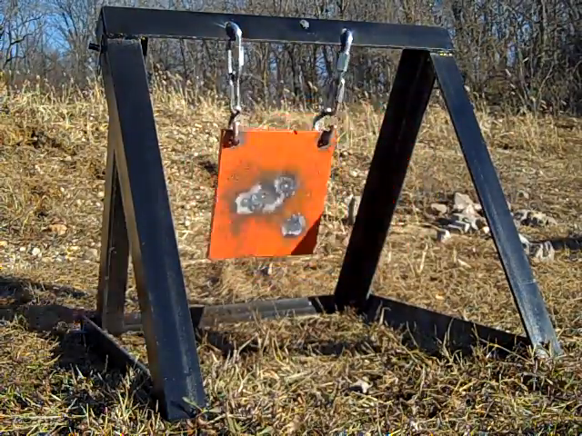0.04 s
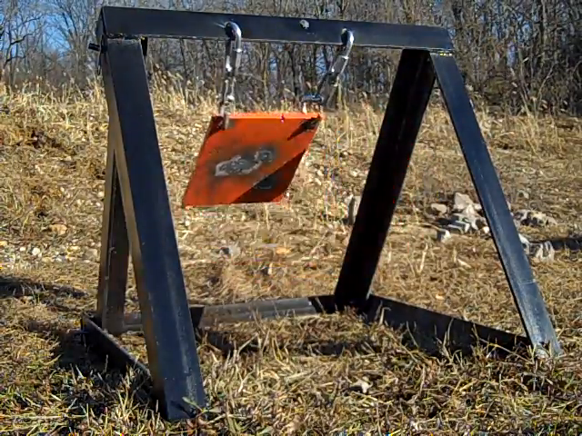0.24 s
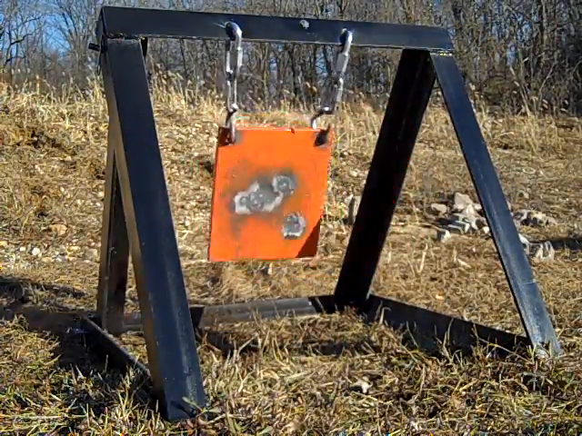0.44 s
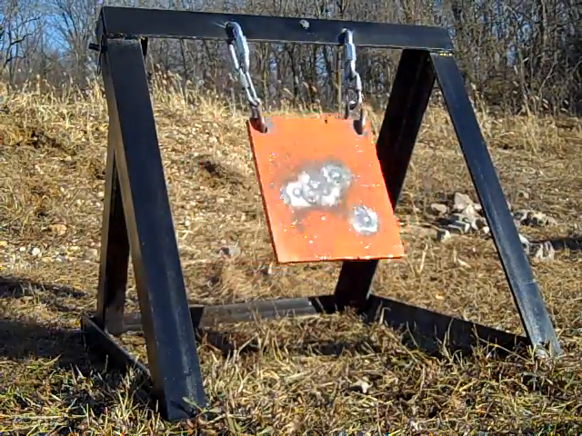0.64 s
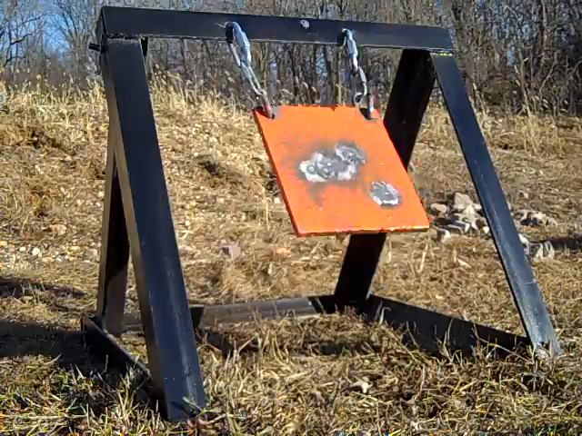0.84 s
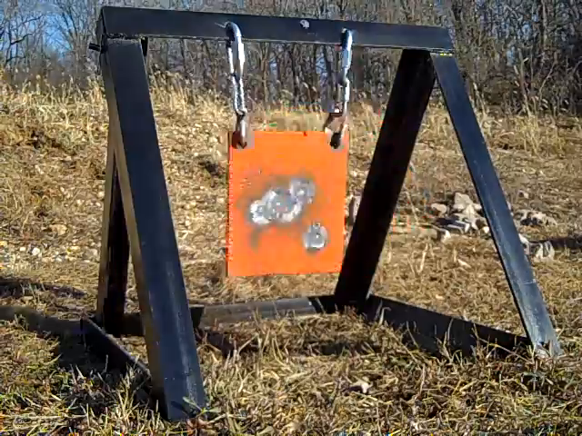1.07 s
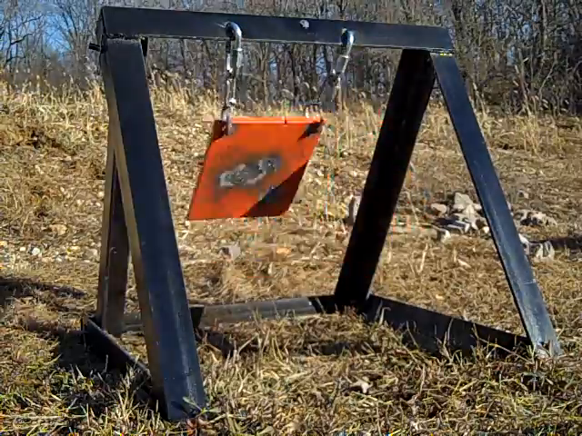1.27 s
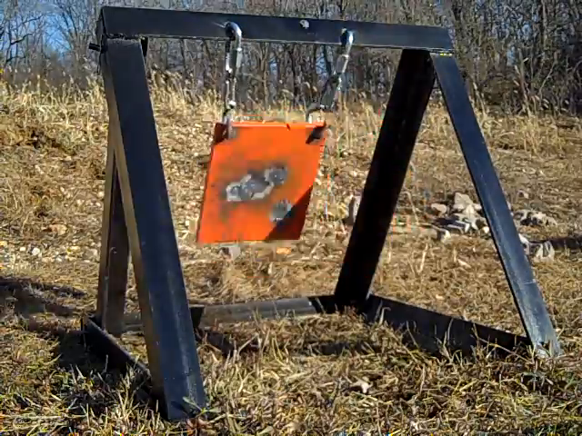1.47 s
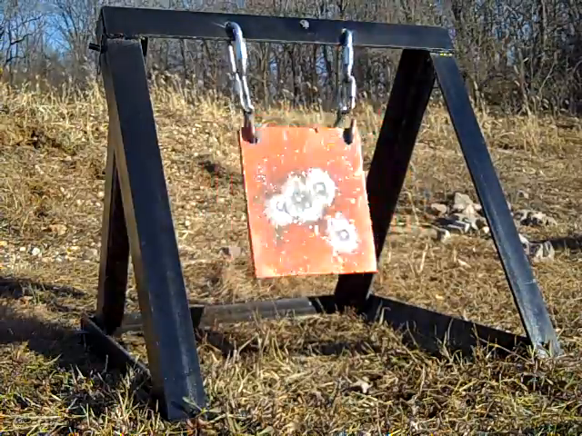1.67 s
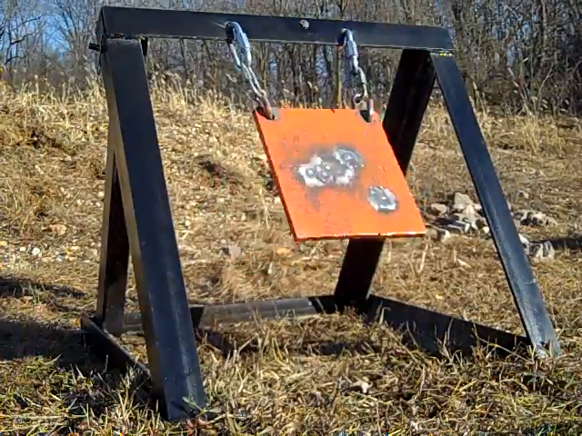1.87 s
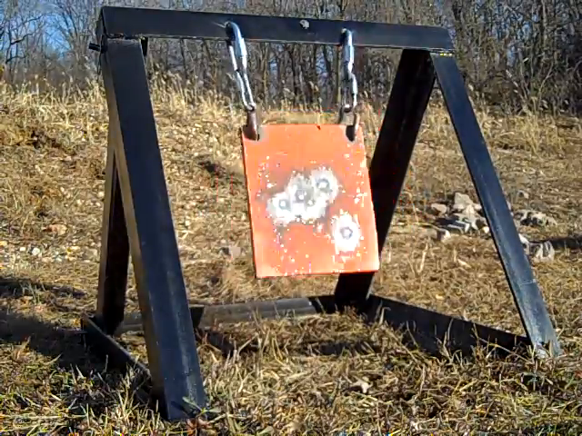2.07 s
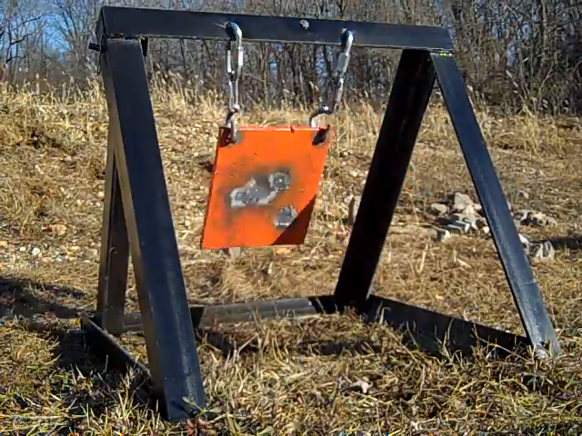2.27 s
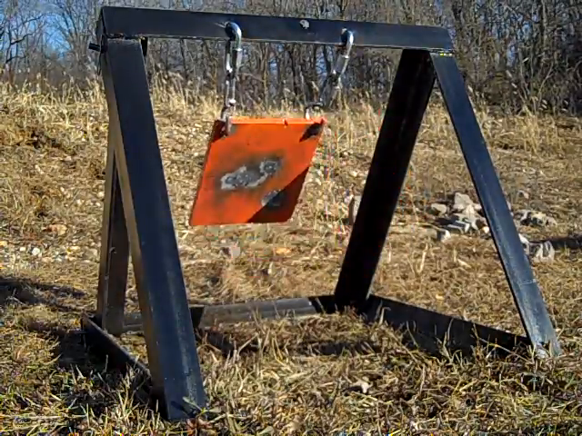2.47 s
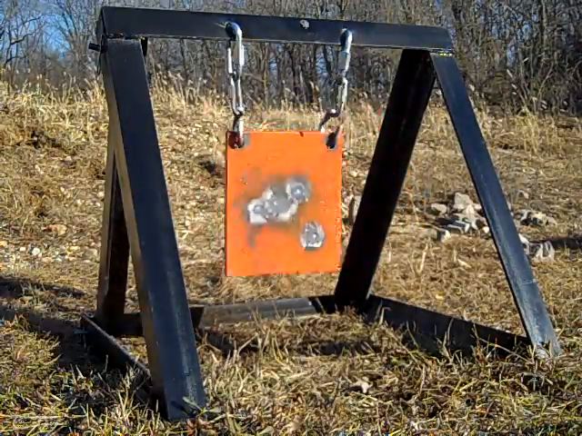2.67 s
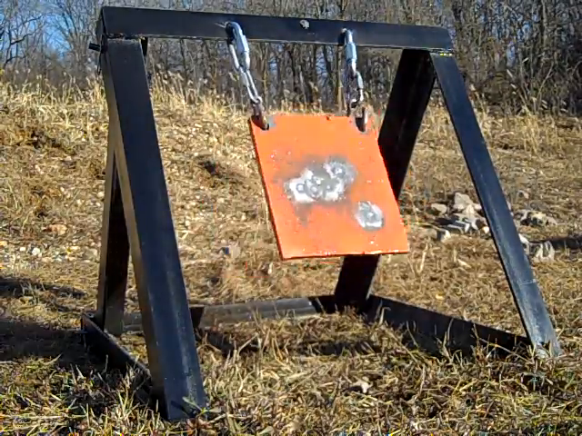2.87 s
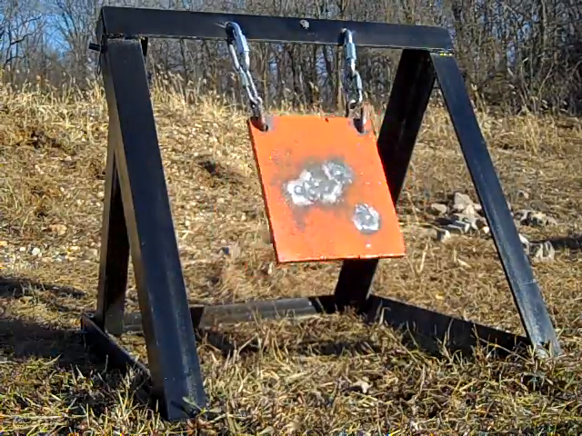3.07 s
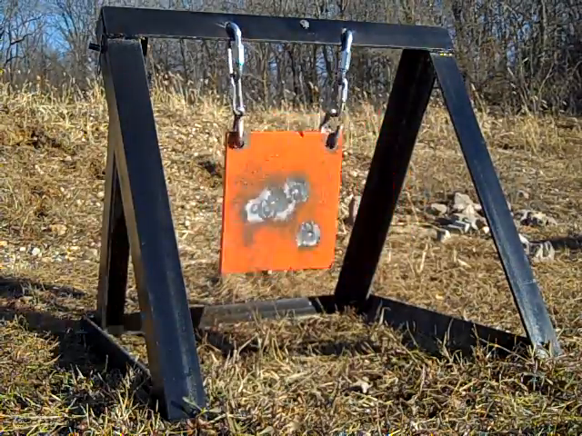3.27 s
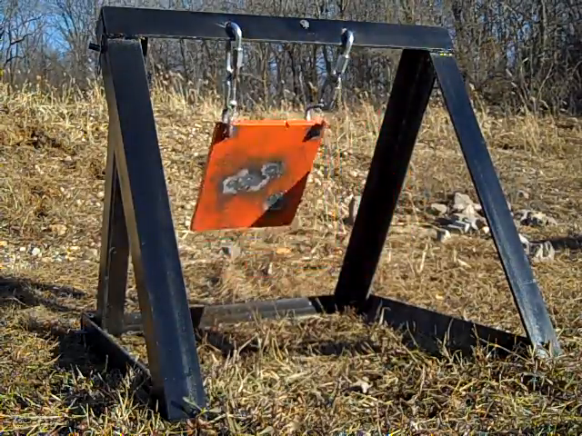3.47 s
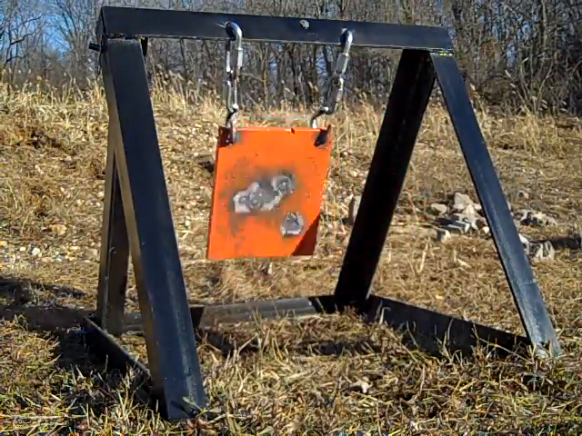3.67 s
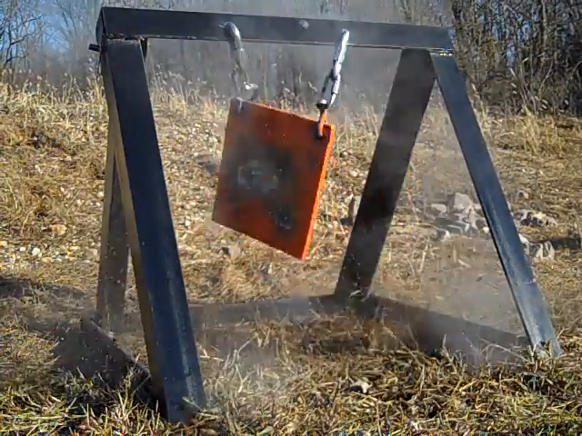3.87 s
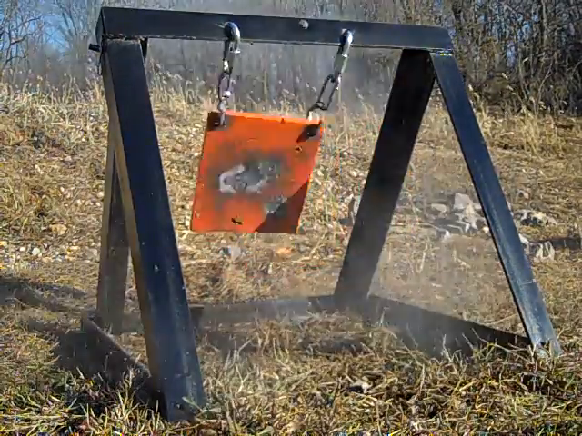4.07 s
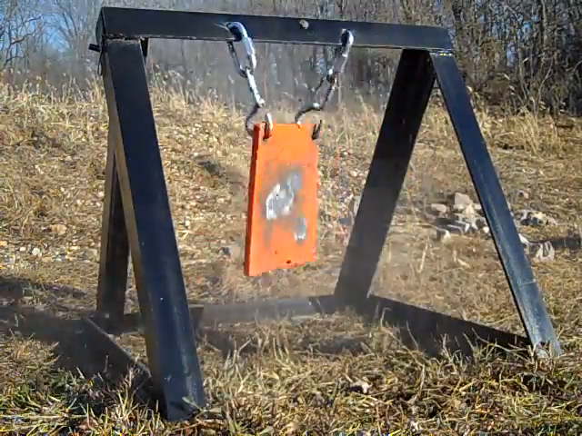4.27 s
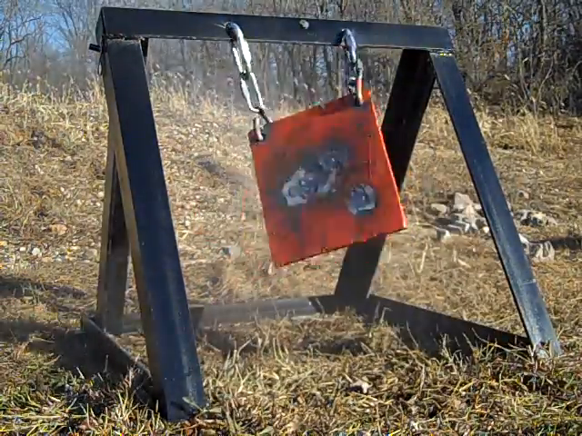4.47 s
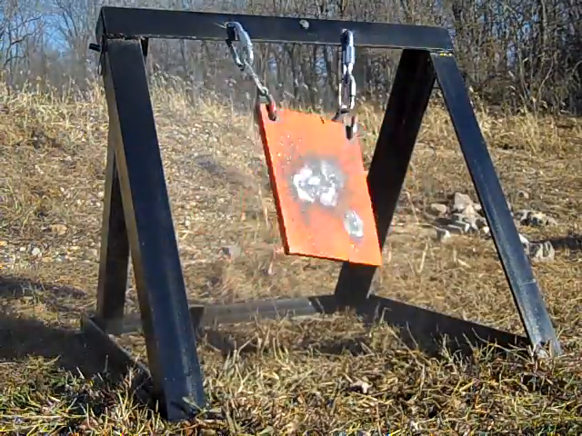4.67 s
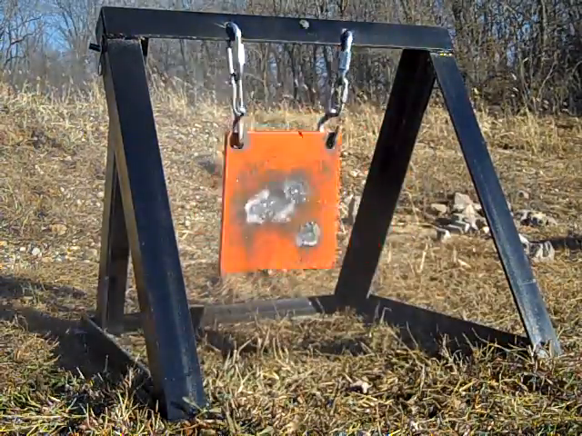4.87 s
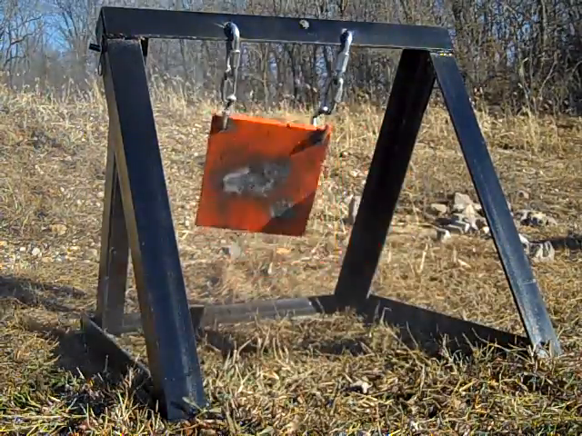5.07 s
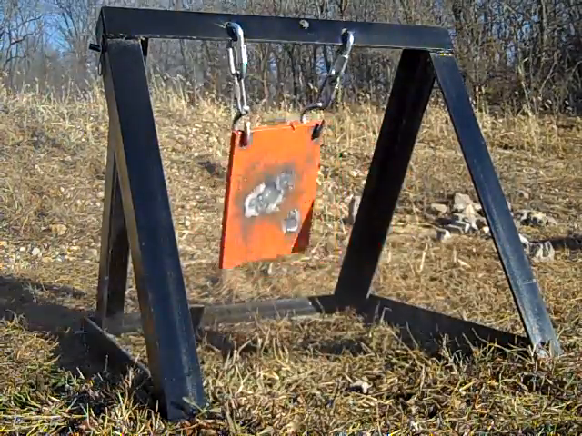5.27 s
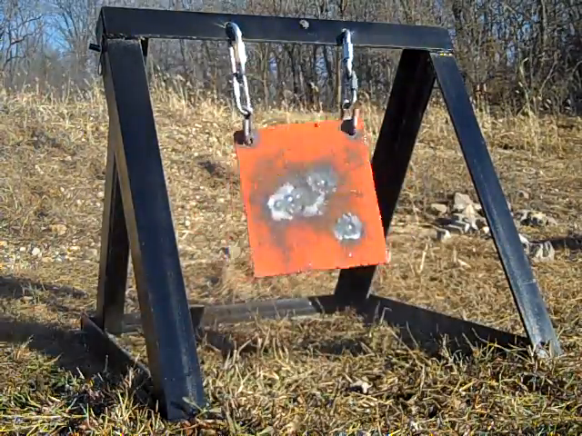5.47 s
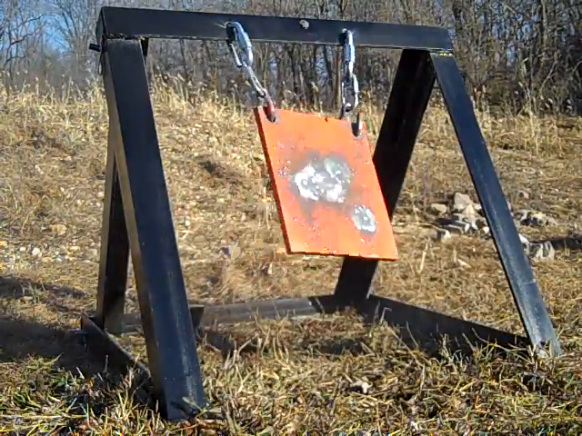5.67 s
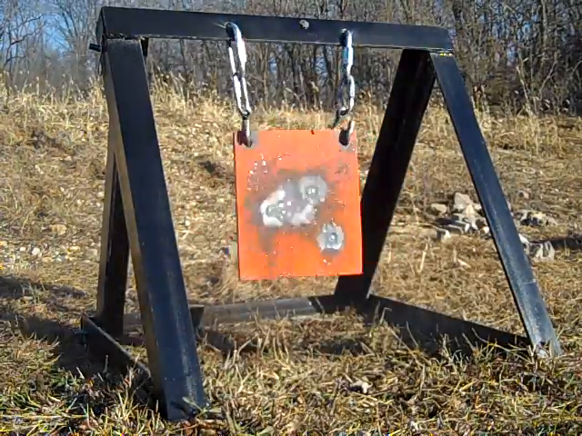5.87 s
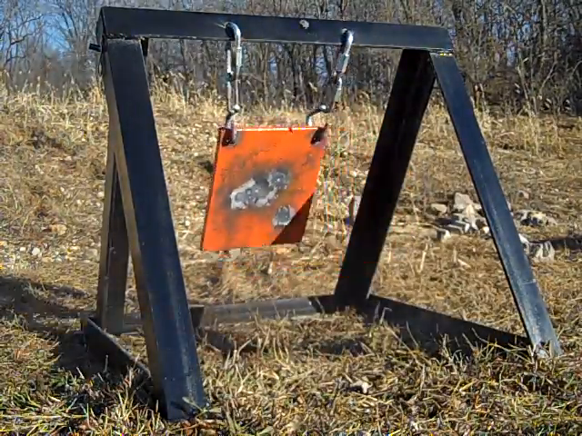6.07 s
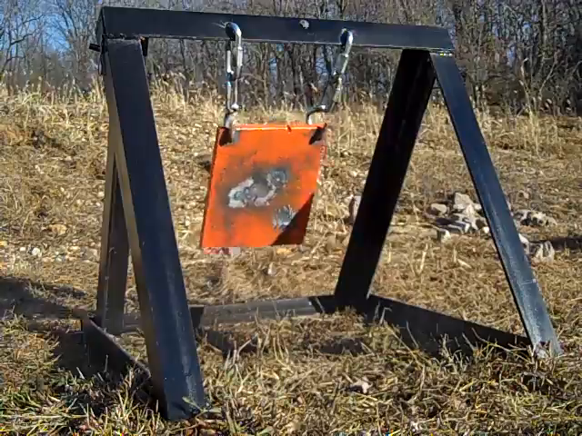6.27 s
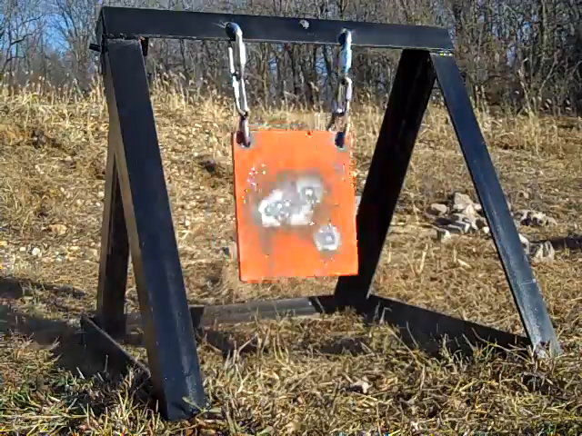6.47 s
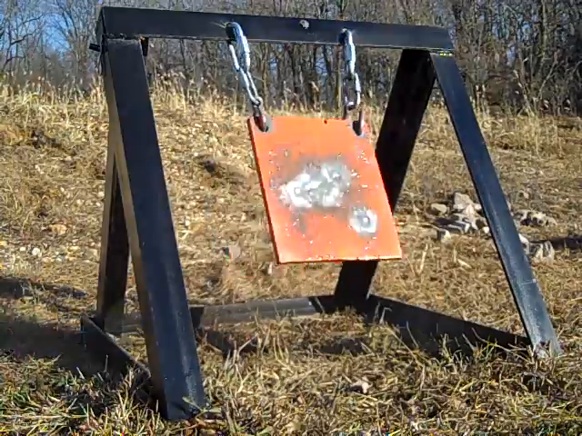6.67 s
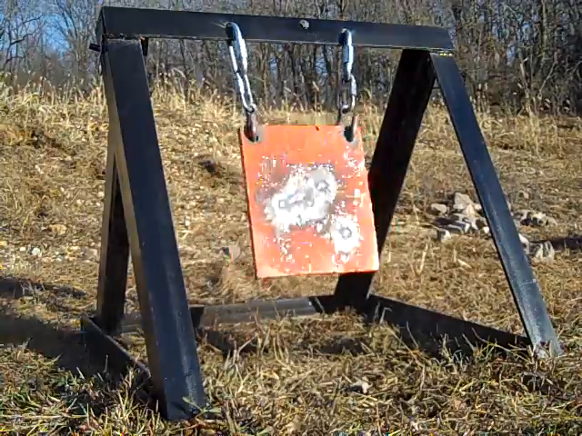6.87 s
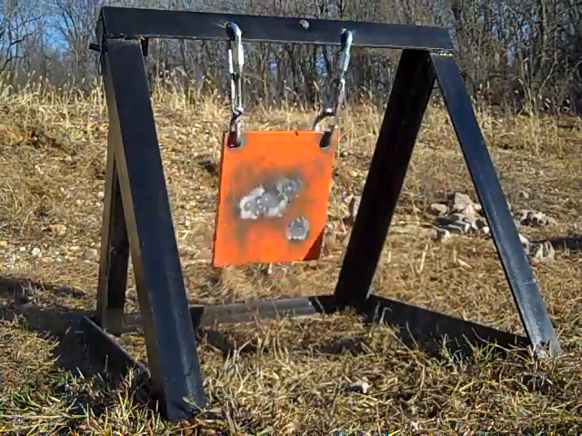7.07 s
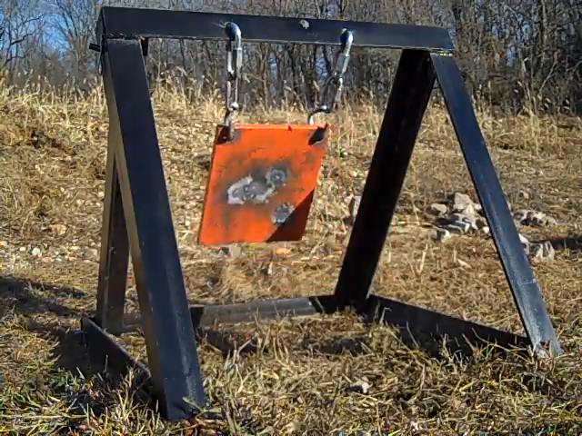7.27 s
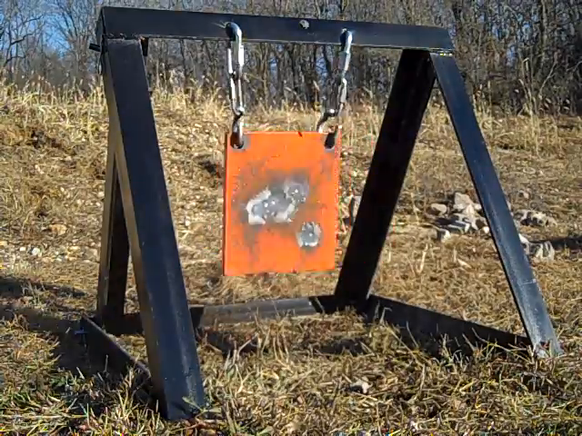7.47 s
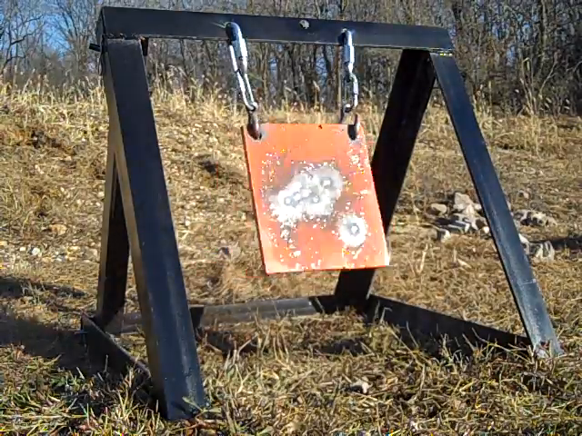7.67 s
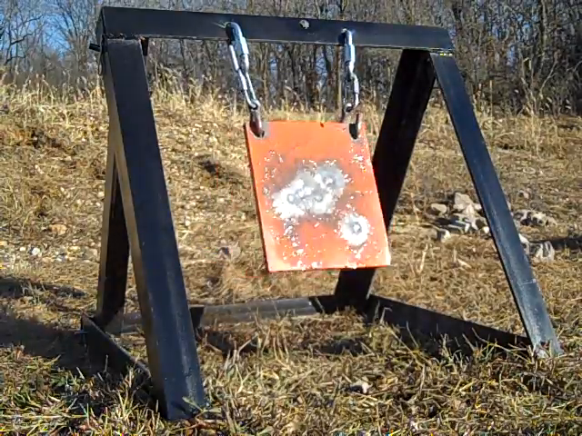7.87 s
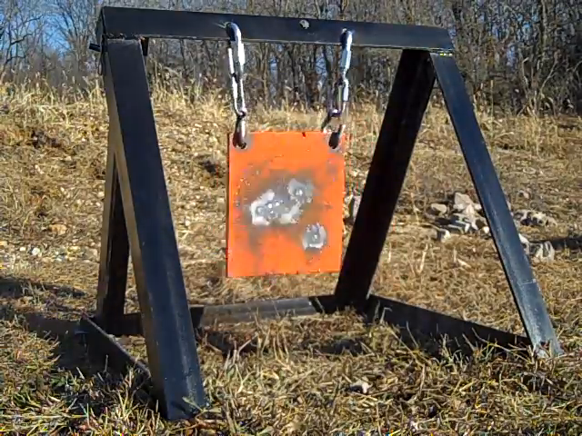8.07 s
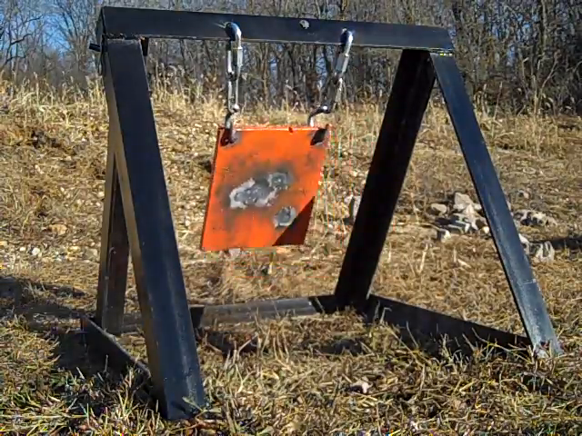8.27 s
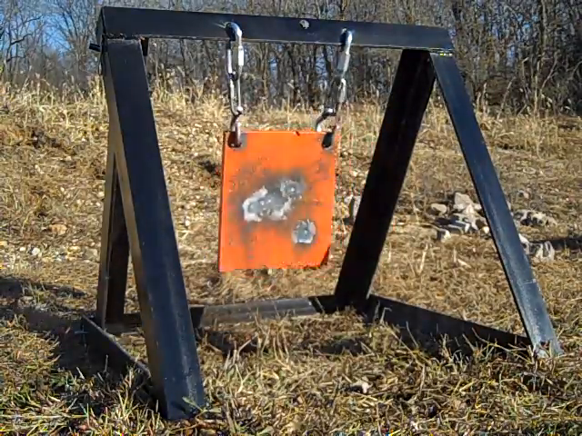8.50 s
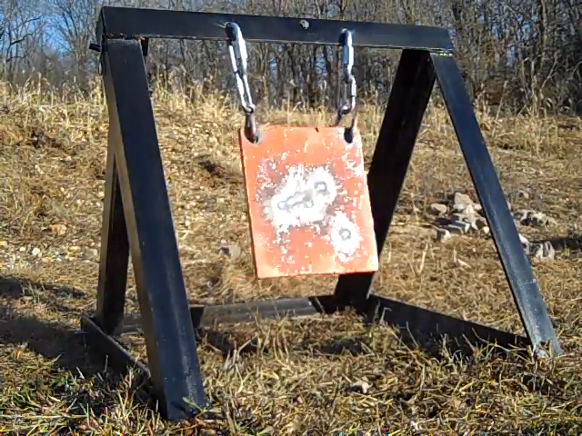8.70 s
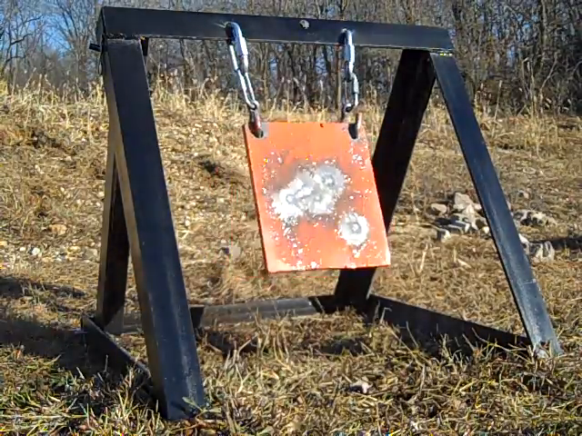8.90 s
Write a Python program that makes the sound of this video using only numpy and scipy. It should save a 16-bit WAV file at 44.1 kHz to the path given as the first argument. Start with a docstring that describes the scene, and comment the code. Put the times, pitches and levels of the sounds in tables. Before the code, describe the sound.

A quiet outdoor field with low airy rumble and faint dry-grass hiss, heard close by in stereo on a small camera microphone. A steel plate swings on chains: bright double clanks at 0.05, 1.1, 2.2 and 3.3 seconds, with fainter slips and ticks between. Light wind buffeting gathers around 3.4-3.7. At 3.85 a bullet hits with an explosive, clipping crack; gritty fragments spray for a fraction of a second and trickle away while high steel tones flare, sweep and shimmer. The dull muzzle thump comes at 4.0, and its rough echo swells from wooded hills to about 4.7, then fades. Chains jerk wildly from 4.4, hardest at 4.93, with a loose rattle at 5.1-5.7, strong clanks at 5.4 and 5.95, and a soft wind puff near 5.9. Weaker clanks follow at 6.5, 7.1 and 8.1, ending in barely audible ticks.

```python
"""A bullet cracks on a hung steel plate; fragments spray, the plate rings as it turns, and the muzzle report
comes late and rolls back from wooded hills. Chains jerk on a steel stand before and after; wind, dry grass.
Steel is decaying or beamed sine modes plus shaped noise; fragments, echo, wind and grass are coloured noise
under envelopes; the report is one filtered pressure pulse. The sum overloads a clipping, band-limited camera."""
import sys
import numpy as np
from scipy import signal
from scipy.fft import rfft, irfft, next_fast_len
from scipy.io import wavfile
from scipy.ndimage import map_coordinates

SR = 44100
rng = np.random.default_rng(int(sys.argv[2]) if len(sys.argv) > 2 else 0)


def master_out(mix):
    """Clip the mix to full scale and print it as 16-bit PCM to the path in sys.argv[1]."""
    frames = np.transpose(np.atleast_2d(mix))
    ceiling = np.clip(frames, -1, 1)
    pcm = np.round(ceiling * 32767).astype(np.int16)
    wavfile.write(sys.argv[1], SR, pcm)


N = 394254
HIT_S, REPORT_S = 3.8505, 4.0168
MEDIUM_JERK_DB = -19.5  # reference on the jerk level scale

# crowded higher modes of the steel: f/Hz, relative density/dB per Hz
CLATTER_SPECTRUM = [(150, -28.5), (600, -16.5), (1000, -4), (1550, -9), (2130, 7.5), (2400, -1.5),
                    (3600, -2), (5500, 1.5), (7500, -6.5), (8300, -6.5), (9000, -18), (11000, -33),
                    (14000, -39)]
# sounds from the front: f/Hz, left-right correlation
FRONT_LIKENESS = [(100, 1), (1500, 0.83), (3000, .88), (6200, .6), (13000, .15)]


def amp(db):
    """Amplitude ratio of a level in dB."""
    return 10 ** (np.asarray(db) / 20)


def unit(x):
    """x scaled to rms 1."""
    return x / np.sqrt(np.mean(x ** 2) + 1e-20)


def along(points, hz):
    """Interpolate (f/Hz, value) points on a log-frequency axis."""
    f, value = np.transpose(points)
    return np.interp(np.log(hz + 1), np.log(f + 1), value)


def clock(n=N):
    """Sample times in s."""
    return np.arange(n) / SR


def wobble(rate_hz, n=N):
    """Smooth random curve through rate_hz random knots a second."""
    knots = rng.standard_normal(int(n * rate_hz / SR) + 4)
    return map_coordinates(knots, [clock(n) * rate_hz])


def filtered(x, response):
    """x with its spectrum multiplied by response(hz)."""
    n = x.shape[-1]
    m = next_fast_len(n + 4096)
    hz = np.fft.rfftfreq(m, 1 / SR)
    return irfft(rfft(x, m) * response(hz), m)[..., :n]


def noise(spectrum, likeness, n=N):
    """Stereo noise of rms 1; the mid/side balance sets the left-right correlation per frequency."""
    def mid_side_gain(hz):
        turn = np.arccos(np.clip(along(likeness, hz), -1, 1)) / 2
        return amp(along(spectrum, hz)) * [np.cos(turn), np.sin(turn)]

    mid, side = filtered(rng.standard_normal((2, n)), mid_side_gain)
    return unit(np.array([mid + side, mid - side]))


def add(out, start_s, x):
    """Mix x into out from start_s, cut at the end."""
    part = out[:, round(start_s * SR):][:, :x.shape[1]]
    part += x[:, :part.shape[1]]


def plate():
    """The turning plate sweeps each mode's lobed beam past the microphone until edge-on; the ground scatters."""
    # plate modes: f/Hz, relative level/dB, beam direction/deg, half-width/deg, lobe spacing/deg
    plate_modes = [(2170, -19, 46, 8, 150), (4352, -5, 54, 12, 150), (5017, -23.5, 42, 11, 150),
                   (6470, 0, 13.5, 7, 22), (6580, -10.5, 37, 45, 25), (7191, -19.5, 37, 17, 23),
                   (8130, -28.5, 37, 20, 150), (9165, -20.5, 28, 45, 21), (10400, -34.5, 60, 40, 26)]
    turn_deg, turn_s = 142.5, .27  # final angle, time constant
    scatter_db, scatter_t60_s = -32, 1.9
    flutter_db = 1.5
    out, t = np.zeros((2, N)), clock(SR)
    angle = turn_deg * (1 - np.exp(-t / turn_s))
    facing = np.sqrt(np.maximum(np.cos(np.radians(angle)), 0))
    port_lag_rad = np.array([[0], [.7]])
    for hz, db, direction, width, spacing in plate_modes:
        off_axis = angle - direction
        lobes = np.hypot(np.cos(np.pi * off_axis / spacing), .2)
        flutter = amp(flutter_db * wobble(110, SR))
        beam = facing * lobes / (1 + (off_axis / width) ** 2) * flutter
        scatter = amp(scatter_db - 60 * t / scatter_t60_s) * np.array([wobble(40, SR), wobble(40, SR)])
        tone = np.sin(2 * np.pi * hz * t + port_lag_rad)
        add(out, HIT_S, amp(db) * (beam + scatter) * tone)
    return out


def spray():
    """The bullet bursts; fragments pepper stand and ground, then grit trickles down: lumpy decaying noise."""
    # fragment noise: f/Hz, relative density/dB per Hz
    grit_spectrum = [(30, 8.5), (300, 1), (700, -3), (2000, -2), (3300, -3), (5000, -3), (7300, -0.5),
                     (9500, -7.5), (13500, -9), (16000, -31.5)]
    # duller landings: f/Hz, gain/dB
    landing_tilt = [(1000, 0), (6000, 0), (12000, -2)]
    burst_db, burst_fall_db_per_s = 0, 400
    shower_db, shower_hold_s, shower_fall_db_per_s = -17, .125, 328  # level before the tilt
    dust_db, dust_fall_db_per_s = -34.5, 56.5  # level before the tilt

    def grit():
        lumps = amp(2.2 * wobble(900) + 1.2 * wobble(70))
        return unit(lumps * noise(grit_spectrum, [(200, .6), (1500, .09), (8000, .2)]))

    t = np.maximum(clock() - HIT_S, 0)
    burst = amp(burst_db - burst_fall_db_per_s * t)
    shower = amp(shower_db - shower_fall_db_per_s * np.maximum(t - shower_hold_s, 0))
    dust = amp(dust_db - dust_fall_db_per_s * t)
    landing = filtered(grit(), lambda hz: amp(along(landing_tilt, hz)))
    return (t > 0) * (burst * grit() + np.hypot(shower, dust) * landing)


def report():
    """The far muzzle blast: one pressure pulse, rounded by its path over the ground."""
    out = np.zeros((2, N))
    u = clock(SR // 10) / .0022  # time in 2.2 ms pulse lengths
    blast = (1 - u) * np.exp(-u)
    path = signal.butter(2, [130, 370], "bandpass", fs=SR, output="sos")
    pulse = signal.sosfilt(path, blast)
    peak_db = [[-3], [-5]]  # left, right
    add(out, REPORT_S, amp(peak_db) * pulse / abs(pulse).max())
    return out


def roll(peak_db, rise_db_per_s, fade_s, loss_db):
    """Echo gain: builds from the report to its peak, then loses loss_db per doubling of 1 + t / fade_s."""
    t = clock() - 4.677  # the main hillside's echo arrives
    rise_db = rise_db_per_s * np.minimum(t, 0)
    fade_db = loss_db * np.log2(1 + np.maximum(t, 0) / fade_s)
    return (clock() > REPORT_S) * amp(peak_db + rise_db - fade_db)


def woods():
    """Countless trunks return the shot as a roll: lumpy noise in a dull and a bright part."""
    # dull part: f/Hz, relative density/dB per Hz
    boom_spectrum = [(21, -53), (35, -30), (81, -12.5), (134, -10), (172, -4), (230, -2), (354, -9.5),
                     (555, -12), (779, -14.5), (841, -14.5), (1400, -27.5), (1820, -64), (3080, -120)]
    # bright part: f/Hz, relative density/dB per Hz
    rush_spectrum = [(600, -32.5), (1200, -1.5), (2200, -1), (3300, -12), (5000, -14), (7500, -12.5),
                     (9500, -27.5), (14000, -41.5)]
    lumps = amp(1.6 * wobble(32))
    boom = unit(lumps * noise(boom_spectrum, FRONT_LIKENESS))
    rush = unit(lumps * noise(rush_spectrum, FRONT_LIKENESS))
    boom_gain = roll(peak_db=-18, rise_db_per_s=44, fade_s=.2881, loss_db=13)
    rush_gain = roll(peak_db=-33, rise_db_per_s=18.5, fade_s=.79, loss_db=23)
    return boom_gain * boom + rush_gain * rush


def chains():
    """Chains jerk the stand; each jerk gets a faint settling tick, and slack links rattle at random."""
    # chains snap taut in pairs once a swing, slip at the far end, jerk wildly after the hit:
    # t/s, level before overall gain/dB, level of the whole clank below about 4 kHz (dull against bright)/dB
    jerks = [(0.0275, -11, -14.5), (0.0617, -8.5, -12), (0.5028, -30, -6), (0.5405, -33, -10),
             (0.6429, -26.5, -12.5), (1.0083, -35, -14), (1.1235, -9, -14.5), (1.1597, -9.5, -12),
             (1.596, -29, -9), (1.7347, -30, -10.5), (2.2084, -13, -15), (2.2527, -9.5, -15.5),
             (2.6726, -30, -8), (2.827, -33, -7.5), (3.2907, -15.5, -14.5), (3.338, -10.5, -16),
             (3.7771, -33, -6), (4.4127, -16, -17), (4.465, -23, -19), (4.5406, -14, -13),
             (4.7009, -15.5, -15.5), (4.7454, -14.5, -12), (4.9075, -11, -18), (4.9318, 1.5, -19.5),
             (4.9453, -2.5, -20), (5.2063, -26, -6), (5.2257, -27, -3), (5.271, -25, -7), (5.3689, -32, 0),
             (5.4018, -7.5, -13), (5.4584, -29, -6), (5.5832, -35, -4), (5.6988, -18.5, -10.5),
             (5.9071, -28.5, -6.5), (5.9448, -10, -17), (6.042, -27, -7), (6.0945, -28.5, -21),
             (6.357, -36, -5), (6.4927, -18.5, -10.5), (7.0393, -24, -10), (7.0848, -12.5, -13),
             (7.4579, -41, -4.5), (7.5978, -33, -9.5), (8.105, -15, -12), (8.159, -17.5, -12.5),
             (8.5852, -41, -10), (8.6539, -33, -15), (8.7151, -39, -6)]
    settle_s, settle_db, settle_db_per_db = .048, -38.5, .32  # nominal gap; tick of a medium jerk; growth
    rattle_start_s, rattle_end_s, rattle_db = 5.12, 5.66, -39  # mean level before overall gain
    out = np.zeros((2, N))
    for s, db, dullness_db in jerks:
        add(out, s, clank(db, dullness_db))
        tick_db = settle_db + settle_db_per_db * (db - MEDIUM_JERK_DB)
        add(out, s + settle_s * rng.uniform(.7, 1.4), clank(tick_db, dullness_db=-8.5))
    for s in rng.uniform(rattle_start_s, rattle_end_s, size=9):
        add(out, s, clank(rattle_db + rng.normal(0, 2.5), dullness_db=-5))
    return out


def clank(db, dullness_db):
    """One jerk cracks, rings stand and links, and its crack rebounds 4-7 ms later."""
    # steel stand modes: f/Hz, relative level/dB, t60/s
    stand_modes = [(950, -15, .2), (1865, -11, .22), (1976, -11.5, 0.17), (2145, 4, .11), (2602, -4.5, .2),
                   (2860, -0.5, .15), (3020, -8, .2), (3550, -7, .17), (3652, -6, .2), (4496, -3, .12),
                   (4872, -4, .14), (5420, -2.5, .14), (5577, -3.5, .16), (5696, -4.5, .15), (6045, -6, .1),
                   (6336, 1.5, 0.14), (7004, -8, .19), (7200, -11, .2), (7332, -7.5, .19),
                   (8270, -3.5, .12)]
    # chain link modes: f/Hz, relative level/dB, t60/s
    link_modes = [(4400, -6, .14), (4930, -1, .13), (6320, 2.5, 0.11), (6590, -3, 0.23), (7160, -3, .13),
                  (7680, 3, .14), (8260, -9, 0.19), (8629, -7.5, .14), (9300, -23.5, .15),
                  (10300, -20, 0.24)]
    overall_gain_db, contact_rise_s = -9.5, .00043
    neutral_dullness_db = -11  # neither boosts nor cuts below about 4 kHz

    def bite(u):
        return 1 - np.exp(-np.maximum(u, 0) / contact_rise_s)

    def colour(hz):
        low_weight = along([(3000, .93), (4200, 0)], hz)
        treble_db = along([(8800, -.5), (11500, -1.5)], hz)
        return amp(low_weight * (dullness_db - neutral_dullness_db) + treble_db)

    t = clock(SR // 4)
    hardness_db = db - MEDIUM_JERK_DB
    rebound = t - rng.uniform(.004, .007)
    contact = amp(-60 * t / .021) + .6 * bite(rebound) * amp(-60 * abs(rebound) / .014)
    crack = amp(.5) * contact * noise(CLATTER_SPECTRUM, FRONT_LIKENESS, len(t))
    # hard jerks favour the links, soft ones the stand
    links = amp(-12 + .35 * hardness_db) * ring(link_modes, t, scatter_db=5.5)
    stand = amp(-4 - .085 * hardness_db) * ring(stand_modes, t, scatter_db=5)
    blow = bite(t) * (crack + amp(-1) * clatter(len(t)) + stand + links)
    return amp(db + overall_gain_db) * filtered(blow, colour)


def ring(modes, t, scatter_db):
    """Struck decaying modes, nominal starting rms 1; higher ones reach the two ports more out of step."""
    hz, db, t60 = np.transpose(modes)[:, :, None]
    size = amp(db + scatter_db * rng.standard_normal(hz.shape))
    port_phase = rng.standard_normal((2, *hz.shape)) * hz / 9000
    phase = rng.uniform(0, 2 * np.pi, hz.shape) + port_phase
    tones = size * amp(-60 * t / t60) * np.sin(2 * np.pi * hz * t + phase)
    return tones.sum(1) / np.sqrt(np.sum(size ** 2) / 2)


def clatter(n):
    """Crowded modes of the steel: noise whose bands each die at their own speed."""
    # band decay: f/Hz, t60/s
    band_t60 = [(700, .17), (2000, .13), (5000, 0.1), (9000, .11), (13000, .07)]
    hz, t, z = signal.stft(noise(CLATTER_SPECTRUM, FRONT_LIKENESS, n), SR, nperseg=128)
    decay = amp(-60 * t / along(band_t60, hz)[:, None])
    return signal.istft(z * decay, SR, nperseg=128)[1][:, :n]


def wind():
    """Gusts buffet the ports with nearly independent noise; single eddies push and then pull."""
    # gusts: t/s, Gaussian half-length/s, left level/dB, right level/dB
    gusts = [(2.864, 0.013, -46, -36), (2.958, 0.029, -44, -37), (3.168, 0.039, -41, -40),
             (3.456, 0.093, -32, -35), (3.627, 0.013, -20, -27), (3.72, 0.072, -39, -42)]
    # eddies: t/s, half-length/s, left peak/dB, right peak/dB
    puffs = [(3.625, 0.0018, -18, -46), (3.642, 0.0015, -19, -46), (5.891, 0.0033, -21.5, -50),
             (6.642, 0.0049, -31.5, -48)]
    # buffeting: f/Hz, relative density/dB per Hz
    buffet_spectrum = [(12, -38.5), (20, -3), (87, 2), (190, -14), (252, -21), (455, -33.5), (500, -27),
                       (650, -61), (1100, -120)]
    strength = np.zeros((2, N))
    for s, length, left_db, right_db in gusts:
        swell = np.exp(-.5 * ((clock() - s) / length) ** 2)
        strength += amp([[left_db], [right_db]]) * swell
    out = strength * noise(buffet_spectrum, [(50, .1)])
    for s, length, left_db, right_db in puffs:
        u = (clock() - s) / length
        out -= amp([[left_db], [right_db]]) * u * np.exp(1 - abs(u))
    return out


def field():
    """Far outdoor rumble as slowly wavering noise; dry-grass hiss swells once with the breeze."""
    # outdoor air: f/Hz, relative density/dB per Hz
    air_spectrum = [(12, -38), (20, -12.5), (101, -2), (184, -7.5), (249, -9), (310, -12), (346, -10.5),
                    (408, -17.5), (455, -17), (766, -25), (1060, -26.5), (2110, -28.5), (3180, -29),
                    (7870, -31.5), (14000, -38.5)]
    # outdoor air: f/Hz, left-right correlation
    air_likeness = [(60, 0.85), (180, 0.89), (520, 0.64), (1550, 0.18), (4580, -0.19), (13500, -0.18)]
    air_db, calm_grass_db = -50.5, -64.5
    breeze_rise_db, breeze_s, breeze_half_length_s = 9, 3.9, 1.8
    grass_spectrum = [(3000, -20.5), (5800, -6.5), (7600, .5), (9500, -11), (14000, -20.5)]
    hiss = noise(grass_spectrum, [(7000, .2)])
    breeze = np.exp(-((clock() - breeze_s) / breeze_half_length_s) ** 2)
    grass = amp(calm_grass_db + breeze_rise_db * breeze) * hiss
    air = amp(air_db) * amp(.7 * wobble(4)) * noise(air_spectrum, air_likeness)
    return air + grass


def scene():
    """Sum of all sources; chains and woods pass the ports' left-right imbalance."""
    # port imbalance: f/Hz, left minus right/dB
    port_difference = [(200, -0.5), (1200, 0), (4000, -2), (7400, 4.5), (13500, 10.5)]
    front = filtered(chains() + woods(), lambda hz: amp(np.outer([.5, -.5], along(port_difference, hz))))
    return front + plate() + spray() + report() + wind() + field()


def record(dry):
    """The camera clips at 0.92 of full scale, then removes everything above its band limit."""
    top_hz, edge_hz = 14200, 400
    clipped = np.clip(dry, -.92, .92)
    return filtered(clipped, lambda hz: np.clip((top_hz - hz) / edge_hz + .5, 0, 1))


dry = scene()
out = record(dry)
master_out(out)
```